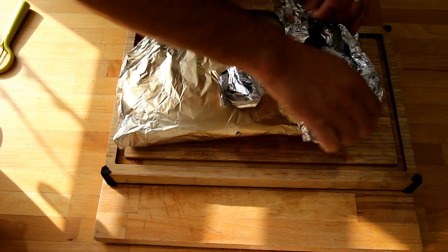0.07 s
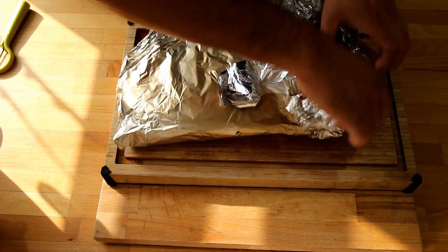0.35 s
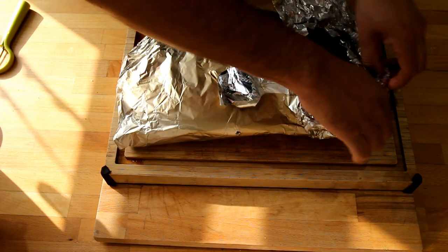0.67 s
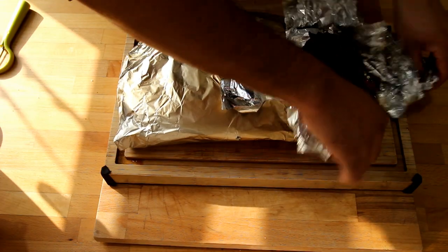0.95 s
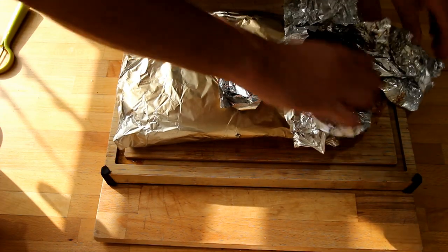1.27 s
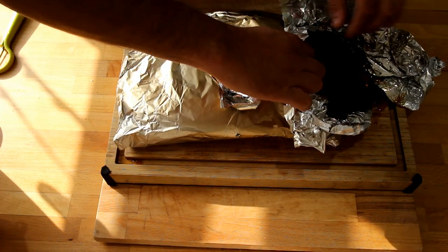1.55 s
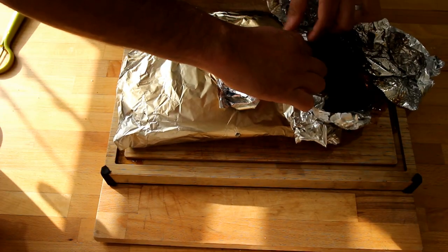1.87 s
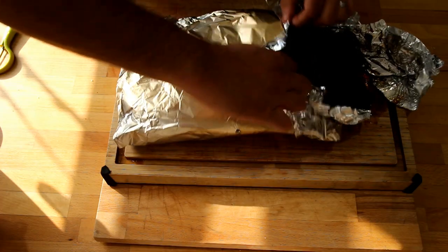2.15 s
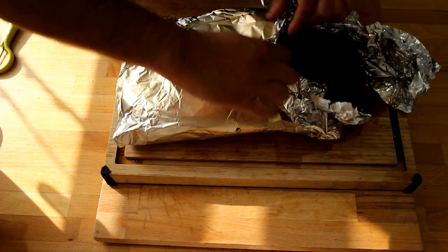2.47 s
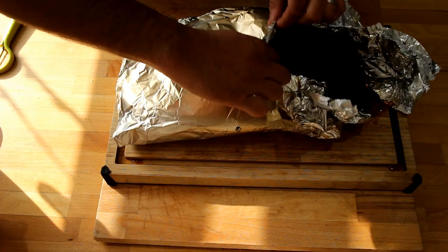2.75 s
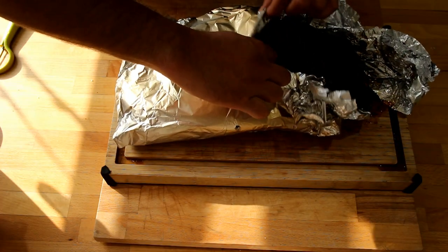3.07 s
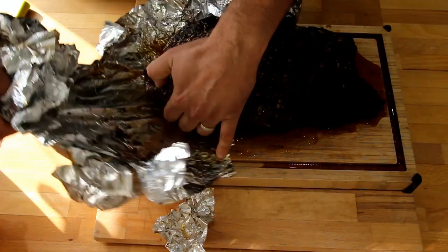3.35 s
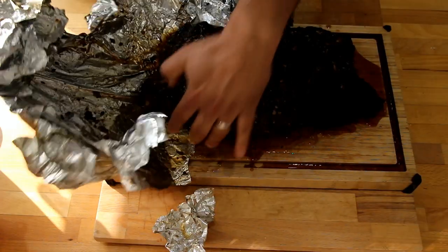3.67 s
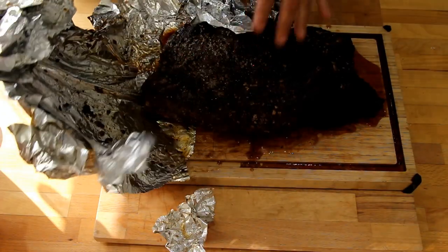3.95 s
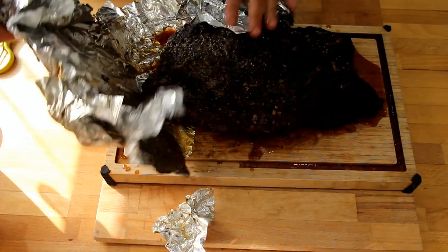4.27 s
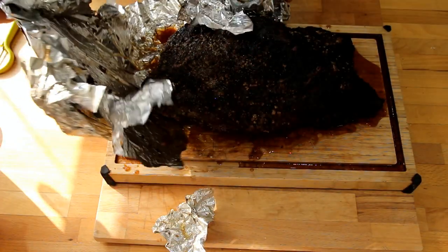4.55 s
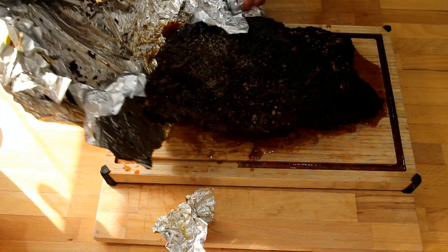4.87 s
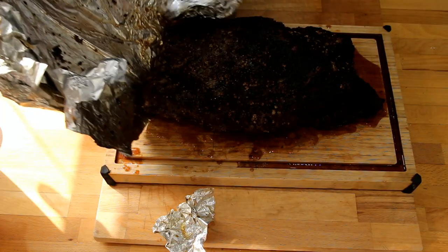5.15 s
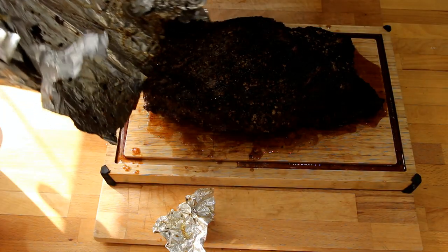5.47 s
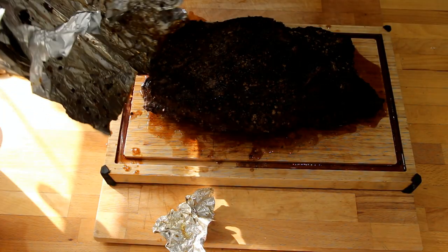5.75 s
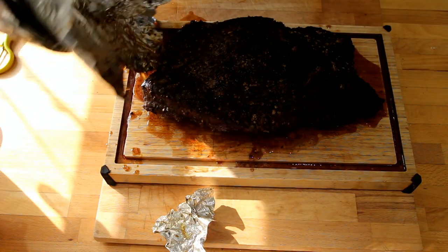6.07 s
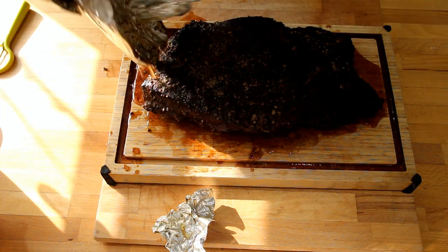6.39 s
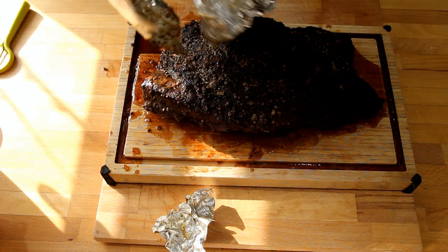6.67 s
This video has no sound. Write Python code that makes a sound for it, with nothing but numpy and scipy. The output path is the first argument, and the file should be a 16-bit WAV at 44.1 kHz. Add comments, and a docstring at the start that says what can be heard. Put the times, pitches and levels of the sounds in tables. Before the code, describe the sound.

Bright, dense crackling comes in irregular surges as hands pull aluminium foil away from cooked meat, close to the microphone. Bigger creases snap sharply, the sheet flaps dully underneath, and a few soft knocks come from the wooden board. The crinkling continues as the foil is gathered, then grows sparse and ends with one more snap. The kitchen adds a short echo and a faint hiss.

```python
"""Crumpled aluminium foil is peeled off a roast on a wooden board, heard close up in a kitchen. At the first
pull the loose sheet flaps dully and creases buckle by the hundred, each ringing the foil's bending modes for a
few milliseconds. As pull follows pull, big creases snap through alone, from 0.8 to 3.1 s the meat bumps the
board, and a low puff of air thuds at 3.7 s. The foil is then gathered up; after 6 s the crackle thins, with a
last snap at 6.8 s. Every crack leaves a short room tail over a faint, steady hiss."""
import sys
import numpy as np
from scipy import signal
from scipy.fft import rfft, irfft
from scipy.io import wavfile
from scipy.ndimage import uniform_filter1d

SR = 44100
rng = np.random.default_rng(int(sys.argv[2]) if len(sys.argv) > 2 else 0)


def transcribe(signal):
    """Save signal, clipped to [-1, 1], as a 16-bit WAV file at the path in sys.argv[1]."""
    frames = np.atleast_2d(signal).T
    limited = np.clip(frames, -1, 1)
    pcm = np.round(limited * 32767).astype(np.int16)
    wavfile.write(sys.argv[1], SR, pcm)


N = 305172
TIME = np.arange(N) / SR
# The foil's levels refer to this core band; "body" lies below it, "sizzle" above.
CORE_LOW_HZ, CORE_HIGH_HZ = 1400, 5500


def crackle(count=4600, size=900, crowding=.55, catch_db=1.5, gain_db=-.5):
    """Crackling noise: a stressed sheet yields in discrete buckles, denser and louder with effort."""
    progress = np.cumsum(undb(crowding * effort()))
    times = np.interp(np.sort(rng.random(count)), progress / progress[-1], TIME)
    work_db, sheet_body_db, sheet_sizzle_db, sheet_hz = hands(times)
    body_z, sizzle_z, choice_z, pitch_z, decay_z = np.clip(rng.standard_normal((count, 5)).T, -2, 2)
    # most buckles are tiny and bright, a few stand out and are duller
    size_db = np.minimum(4 * rng.exponential(size=count), 13)
    body_db = sheet_body_db - 1.5 + 2.5 * body_z
    sizzle_db = sheet_sizzle_db + 2 + 5.5 * sizzle_z - .52 * size_db
    # some flip the working facet again, the others are of any width
    facet_hz = np.where(choice_z > .5, sheet_hz * np.exp(.05 * pitch_z), 2400 * np.exp(.55 * pitch_z))
    # a sharp crack, then bending waves fading in the sheet
    t = np.arange(size) / SR
    decay_s = .0056 * np.exp(.35 * decay_z)
    ring = 1.2 * np.exp(-t / .0003) + np.exp(-t / decay_s[:, None])
    grains = buckles(body_db, sizzle_db, facet_hz, ring, note_db=-7, focus_db=8)
    # the buckles of each moment share the energy that the hands put in
    power = place(times, undb(size_db)[:, None] ** 2)
    power = uniform_filter1d(uniform_filter1d(power, size=1500), size=1000)
    share = undb(size_db) / np.sqrt(np.interp(times, TIME, np.abs(power)) + 1e-9)
    # the foil catches and slips at random
    grip = np.clip(rng.standard_normal(200), -1.5, 1.5)
    catches = np.interp(times, np.linspace(0, TIME[-1], len(grip)), grip)
    return place(times, grains * (share * undb(work_db + catch_db * catches + gain_db))[:, None])


# Pulls and squeezes of the foil: start_s, length_s, level_db, body_db, sizzle_db, facet_pitch_hz
FOIL_PULLS = [(0.0, .06, -18, -1.5, -0.5, 1566), (0.11, .08, -22, -1, 3, 3960),
              (0.41, .03, -26, 4, 0, 2000), (0.505, .26, -24, -0.5, -1, 2030), (0.89, .22, -19, 5, 2, 2190),
              (1.235, .085, -23, -9, -0.5, 2070), (1.512, .018, -26.5, -8, -3, 4230),
              (1.775, .03, -27, -16, -0.5, 3000), (2.09, .08, -22.5, -3.5, 0, 4270),
              (2.215, .11, -19.5, -2.5, -1, 4200), (2.549, .14, -25, 0, -1.5, 2520),
              (3.09, .22, -20.3, -1.5, -1, 2270), (3.485, .04, -25, 2.5, -2, 2200),
              (3.565, .085, -20.5, 0, -2.5, 2220), (4.11, .055, -27, 0.5, 4.5, 2030),
              (4.58, .07, -24, 1, 5, 4300), (4.73, .14, -19, 3, 1, 4400), (4.94, .14, -21, 1, -4, 1480),
              (5.255, .03, -23, -2, 0, 4300), (5.49, .04, -23, -1, -8, 2300),
              (5.78, .09, -25, -2.5, -8, 1870), (5.995, .07, -27, 1, 3, 3850), (6.11, .02, -24, 0, 2, 4300),
              (6.375, .08, -34, -4, 2, 2800), (6.619, .08, -44, -5, 0, 1517),
              (6.801, .02, -33, -5, 2, 3960)]
# Light handling between pulls: time_s, level_db, body_db, sizzle_db
LIGHT_HANDLING = [(0.3, -43, 5, 5), (0.82, -29, 5, 9.5), (1.22, -28, -4, 0), (1.41, -36, 17, -7),
                  (1.6, -42, 9, -2), (1.68, -34, -1, 0), (1.95, -29, 0.5, 3), (2.48, -28.5, 2, 4),
                  (2.8, -28.5, -9.5, 0.5), (2.9, -39, 2, 6), (3.05, -30, 8.5, 6), (3.4, -32.5, 10.5, 0),
                  (3.95, -32, -4, -1.5), (4.26, -40, 6, 0), (4.44, -28.5, 4, 1), (5.17, -25, 6, 1.5),
                  (5.72, -34, 10.5, 2), (5.95, -31, 3, -5), (6.25, -38, 3, -3), (6.73, -48, 5, 0)]

def hands(times):
    """Incoherent sources add in power: each colours the crackle by its share; the strongest sets pitch."""
    start_s, length_s, level_db, body_db, sizzle_db, facet_hz = np.transpose(FOIL_PULLS)
    rise_db_per_s, slacken_db_per_s, settle_db_per_s = 300, 6, 340
    age_s = times[:, None] - start_s
    pull_db = (level_db - rise_db_per_s * np.maximum(-age_s, 0)
               - slacken_db_per_s * np.clip(age_s, 0, length_s)
               - settle_db_per_s * np.maximum(age_s - length_s, 0))
    pull_power = undb(pull_db) ** 2
    light_power = undb(curve(LIGHT_HANDLING, times)) ** 2
    power = pull_power.sum(axis=1) + light_power
    body = (pull_power @ body_db + light_power * curve(LIGHT_HANDLING, times, column=2)) / power
    sizzle = (pull_power @ sizzle_db + light_power * curve(LIGHT_HANDLING, times, column=3)) / power
    return 10 * np.log10(power), body, sizzle, facet_hz[pull_db.argmax(axis=1)]


def effort(hop=128):
    """The driving envelope: how hard the foil is worked at each sample, as crackle level in dB."""
    return np.interp(TIME, TIME[::hop], hands(TIME[::hop])[0])


# Big creases giving way: start_s, level_db (over 7 ms), body_db, sizzle_db, facet_pitch_hz
CREASE_SNAPS = [(0.195, -22, -2, 8, 8200), (0.306, -40, -12, 11, 2500), (0.732, -34, -5, 20, 2100),
                (0.770, -12.5, -6, -5, 2100), (1.2425, -14, -8, -4, 4350), (1.282, -20, -2, 1, 4000),
                (1.414, -28, 1, -3, 4250), (1.5, -22, -21, -7, 4250), (1.559, -22, -20, -1, 2950),
                (1.6115, -24, -11, -2, 4200), (1.738, -27, 8, -1, 4200), (1.759, -23, -19, 0, 3800),
                (1.775, -22.5, -21, -3, 3050), (1.787, -20, 3, -4, 1200), (1.832, -21, -20, -5, 2950),
                (1.974, -23, -18, 2, 4400), (2.171, -18, -18, -7, 3300), (2.5385, -19, -6, 4, 3250),
                (2.549, -21, -2, 9, 4100), (2.881, -24, -19, -4, 4350), (2.944, -25, -13, 1, 4550),
                (3.04, -21, -20, -2, 3250), (3.5165, -31, -7, 15, 4950), (3.626, -19, 0, -13, 2150),
                (3.642, -20, 1, -5, 4450), (3.766, -23, -9, -19, 3950), (3.794, -40, 2, 23, 9000),
                (3.838, -23, -7, 6, 4450), (3.8765, -13, 2, -1, 2150), (3.968, -24, -5, -10, 2150),
                (4.033, -29, -17, 7, 5600), (4.074, -27, -15, 0, 4200), (4.155, -24, 2, 0, 3100),
                (4.162, -27, -4, 5, 6050), (4.265, -36, -8, 19, 8600), (4.275, -30, -14, 6, 3850),
                (4.423, -20, 1, -9, 4300), (4.62, -26, 1, 14, 7600), (4.714, -18, -13, -2, 4400),
                (5.074, -21, 11, 2, 950), (5.258, -24, 14, -8, 1050), (5.354, -20, 6, -3, 1550),
                (5.489, -16.5, 0, -9, 2400), (5.5285, -16, -13, -2, 3550), (5.6845, -23, -1, -18, 1500),
                (5.837, -20, -17, 0, 3000), (5.9615, -20, -12, -1, 3750), (5.968, -20, -1, 2, 4600),
                (6.172, -23, -12, -4, 4350), (6.376, -28, 1, -1, 3600), (6.404, -30, -10, 7, 4550),
                (6.452, -27, -13, -1, 2750), (6.5435, -32, -2, -2, 4250), (6.599, -25, 1, -20, 2800),
                (6.8145, -20, -7, 6, 4150)]

def snaps(size=900):
    """Snap-through frees stored elastic energy: a crack, a few ms of ringing, a faint after-ring."""
    start_s, level_db, body_db, sizzle_db, facet_hz = np.transpose(CREASE_SNAPS)
    t = np.arange(size) / SR
    ring = .8 * np.exp(-t / .0004) + np.exp(-(t / .0036) ** 2) + .16 * np.exp(-t / .008)
    rings = np.tile(ring, (len(start_s), 1))
    note_db = -3.5 + .23 * np.maximum(-body_db, 0)  # the less body, the purer the ring
    grains = buckles(body_db, sizzle_db, facet_hz, rings, note_db[:, None], focus_db=0)
    return place(start_s, grains * (undb(level_db) * np.sqrt(.007 * SR))[:, None])


# Spectral envelope of a typical buckle: frequency_hz, gain_db
BUCKLE_SPECTRUM = [(100, -22), (220, -12.5), (350, -8.5), (600, -4), (950, -2.5), (1220, -2), (1550, 0.5),
                   (2200, -1.5), (3200, -2), (4250, 1.5), (5300, -3.5), (7000, -9), (13000, -12),
                   (16000, -16.5)]

def buckles(body_db, sizzle_db, facet_hz, ring, note_db, focus_db):
    """Modal overlap: a thin sheet rings as decaying noise, plus one facet's note. One row per buckle."""
    size = ring.shape[1]
    t = np.arange(size) / SR
    hz = np.fft.rfftfreq(size, 1 / SR) + 1
    # wide facets add body, tight creases add sizzle
    shape_db = body_db[:, None] / (1 + (hz / CORE_LOW_HZ) ** 6 + (400 / hz) ** 2)
    shape_db += sizzle_db[:, None] / (1 + (5800 / hz) ** 8)
    # focus favours the modes near the facet's own pitch
    shape_db += focus_db / (1 + (np.log(hz / facet_hz[:, None]) / .25) ** 2)
    response = minimum_phase(colour(BUCKLE_SPECTRUM, size) * undb(shape_db))
    spectra = rfft(rng.standard_normal(ring.shape) * ring) * response
    core = (hz > CORE_LOW_HZ) & (hz < CORE_HIGH_HZ)
    core_energy = 2 * np.sum(np.abs(spectra[:, core]) ** 2, axis=1) / size
    modes = irfft(spectra / np.sqrt(core_energy)[:, None])
    note = np.cos(2 * np.pi * facet_hz[:, None] * t) * np.exp(-t / .0035)
    swell_db = np.where(facet_hz < CORE_LOW_HZ, body_db / 2, 0)  # a low note swells with the body
    note *= (undb(swell_db) / np.linalg.norm(note, axis=1))[:, None]
    return (modes + undb(note_db) * note) / np.hypot(1, undb(note_db))


# Flapping under a firm pull, strongest while the sheet wraps the meat: time_s, relative_level_db
FLAP_LEVELS = [(0.0, -34), (0.3, -43.5), (1.5, -38), (1.95, -43.5), (2.65, -38.5), (2.95, -44),
               (3.15, -40.5), (4.0, -41), (4.9, -47), (5.6, -45), (6.9, -44)]
# Spectral envelope of the flapping sheet: frequency_hz, gain_db
FLAP_SPECTRUM = [(20, -37), (50, -4), (100, -3), (140, 3), (170, -0.5), (210, -0.5), (300, 2.5), (500, -3),
                 (1200, -16.5)]

def flapping(gain_db=3, uneven_db=4.5, firm_pull_db=-21, db_per_effort_db=.43):
    """Panel radiation: whole panels flex in jerks and displace air, more so under a harder pull."""
    jerks = np.interp(TIME, np.linspace(0, TIME[-1], 400), rng.standard_normal(400))
    push = rng.standard_normal(N) * undb(uneven_db * jerks)
    level_db = curve(FLAP_LEVELS, TIME) + db_per_effort_db * (effort() - firm_pull_db) + gain_db
    return tint(push, FLAP_SPECTRUM) * undb(level_db)


# Soft impacts on the board, and a low puff of air at the end: start_s, peak_db, pitch_hz
LOW_BUMPS = [(0.84, -32, 221), (2.22, -30, 124), (2.649, -35, 83.4), (3.107, -27, 132),
             (3.679, -39, 48.4)]

def bumps(rise_s=.0032, decay_s=.0044):
    """Damped oscillation: meat and hands nudge the board, and its swing dies almost at once; the last, lowest
    one is a puff of air."""
    start_s, peak_db, pitch_hz = np.transpose(LOW_BUMPS)
    t = np.arange(SR // 8) / SR
    swing = np.sin(2 * np.pi * pitch_hz[:, None] * t) * (1 - np.exp(-t / rise_s)) * np.exp(-t / decay_s)
    swing /= np.abs(swing).max(axis=1, keepdims=True)
    return place(start_s, swing * undb(peak_db)[:, None])


def kitchen(direct, wet_db=-10.5, t60_s=.36, treble_t60_s=.24, split_hz=5500):
    """Reverberation: walls and cupboards return a short diffuse tail whose treble dies first."""
    t = np.arange(SR // 2) / SR
    tail = np.zeros(len(t))
    for side, band_t60_s in (("low", t60_s), ("high", treble_t60_s)):
        band = signal.butter(2, split_hz, side, fs=SR, output="sos")
        tail += signal.sosfilt(band, rng.standard_normal(len(t))) * undb(-60 * t / band_t60_s)
    tail *= 1 - np.exp(-(t / .008) ** 2)  # the reflections build up
    return direct + undb(wet_db) * signal.fftconvolve(direct, tail / np.linalg.norm(tail))[:N]


# Spectral envelope of the still kitchen: frequency_hz, gain_db
AIR_SPECTRUM = [(20, -27), (40, -17), (140, -30), (400, 2), (1500, 13), (5000, -26), (16000, -24)]

def still_air(level_db=-54):
    """The noise floor: a faint, stationary hiss."""
    return undb(level_db) * tint(rng.standard_normal(N), AIR_SPECTRUM)


def undb(db):
    """Decibels to amplitude ratio."""
    return 10 ** (np.asarray(db) / 20)


def curve(table, times, column=1):
    """Linear interpolation of one table column at the given times."""
    rows = np.array(table, float)
    return np.interp(times, rows[:, 0], rows[:, column])


def colour(spectrum, size):
    """Gain of a spectral envelope at each transform bin, interpolated in log frequency."""
    hz, db = np.transpose(spectrum)
    return undb(np.interp(np.log(np.fft.rfftfreq(size, 1 / SR) + 1), np.log(hz), db))


def tint(x, spectrum):
    """Filtering by a spectral envelope, scaled to unit rms."""
    shaped = irfft(rfft(x) * colour(spectrum, N), N)
    return shaped / shaped.std()


def minimum_phase(gain):
    """Causality: the phase is chosen so that nothing sounds before the blow."""
    cepstrum = irfft(np.log(gain + 1e-6))
    half = cepstrum.shape[-1] // 2
    fold = np.r_[1, np.full(half - 1, 2), 1, np.zeros(half - 1)]
    return np.exp(rfft(cepstrum * fold))


def place(times, grains):
    """Superposition of short sounds, each at its start time."""
    index = (np.maximum(times, 0) * SR).astype(int)[:, None] + np.arange(grains.shape[1])
    return np.bincount(index.ravel(), grains.ravel(), N)[:N]


def scene():
    """Pressures add: reverberant crackle and snaps, dry flapping and bumps, and still air beneath."""
    dull = flapping() + bumps()
    return (kitchen(crackle() + snaps()) + dull + still_air())[None]


def record(dry, cutoff_hz=15900):
    """Soft saturation rounds only the highest peaks; a steep low-pass limits the bandwidth."""
    rounded = dry / (1 + dry ** 4) ** (1 / 4)
    return signal.sosfilt(signal.ellip(10, .2, 80, cutoff_hz, fs=SR, output="sos"), rounded)


dry = scene()
out = record(dry)
transcribe(out)
```